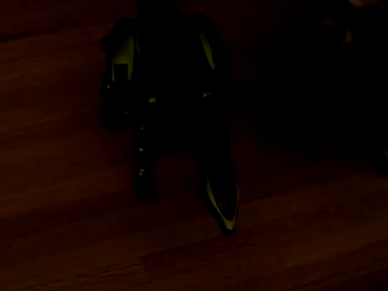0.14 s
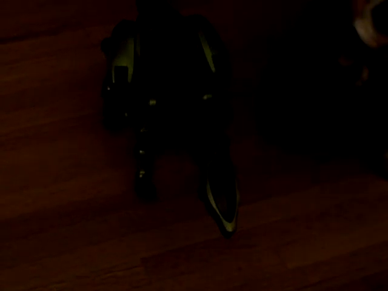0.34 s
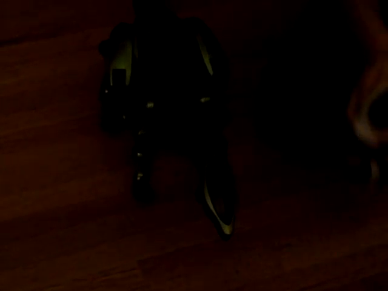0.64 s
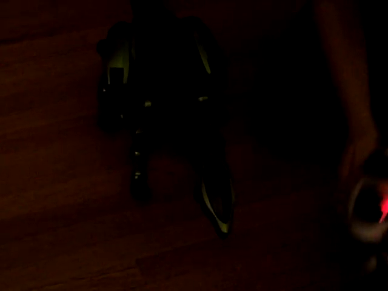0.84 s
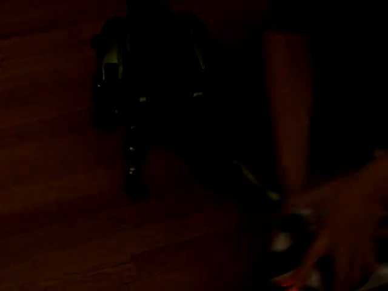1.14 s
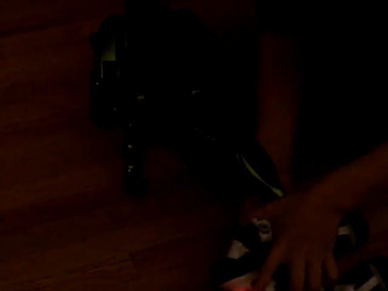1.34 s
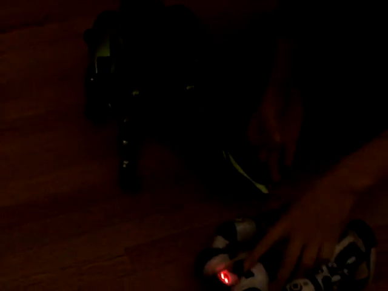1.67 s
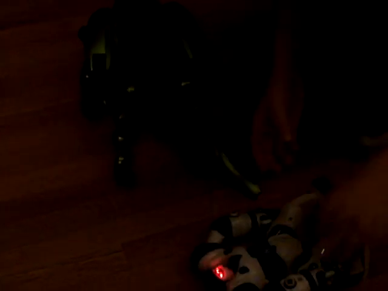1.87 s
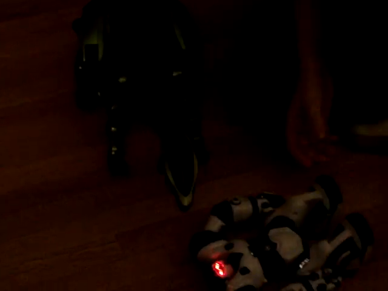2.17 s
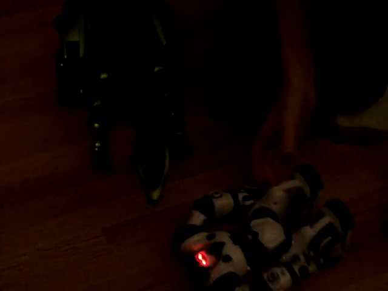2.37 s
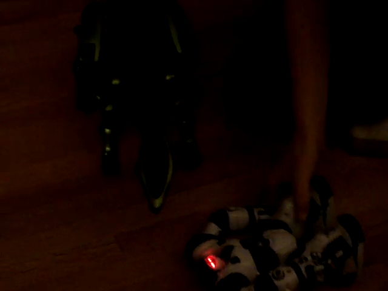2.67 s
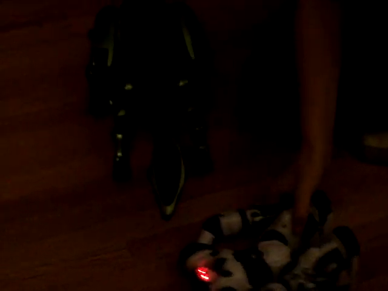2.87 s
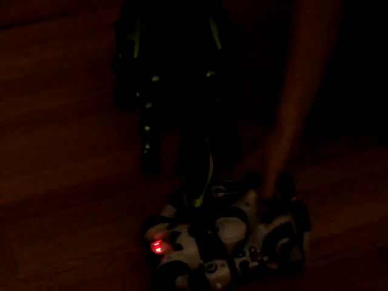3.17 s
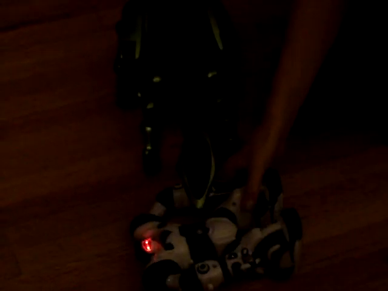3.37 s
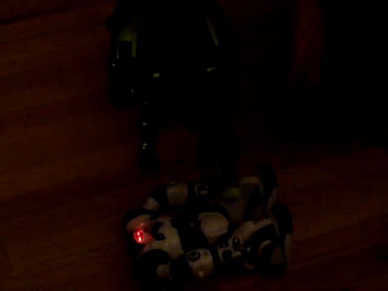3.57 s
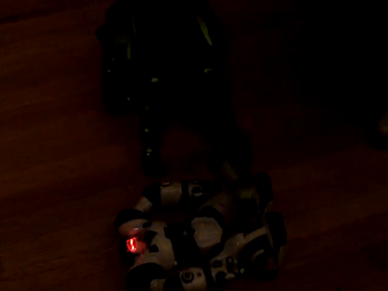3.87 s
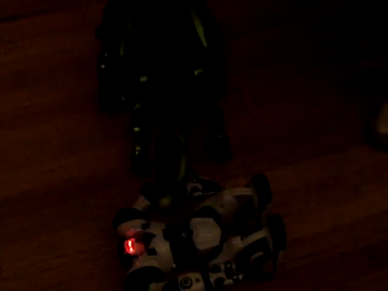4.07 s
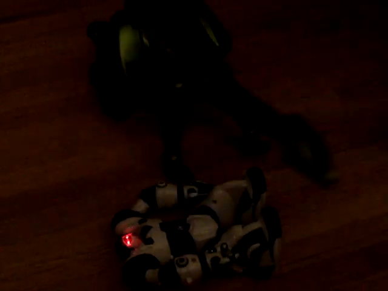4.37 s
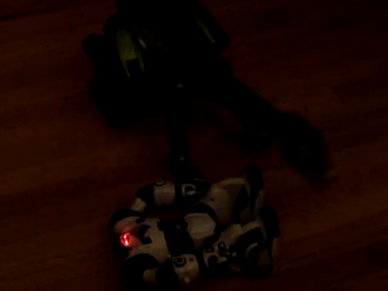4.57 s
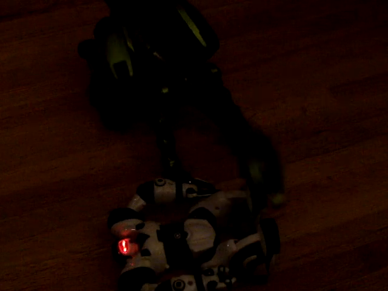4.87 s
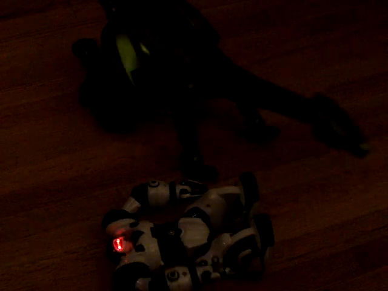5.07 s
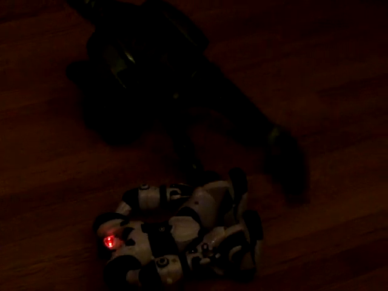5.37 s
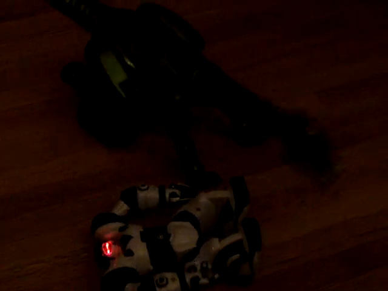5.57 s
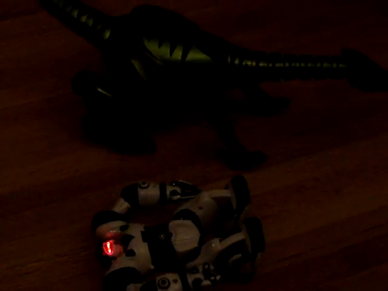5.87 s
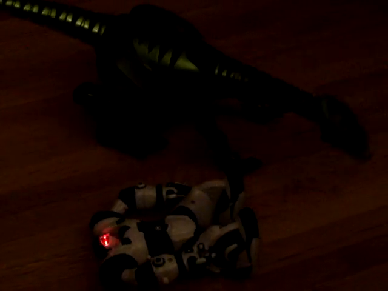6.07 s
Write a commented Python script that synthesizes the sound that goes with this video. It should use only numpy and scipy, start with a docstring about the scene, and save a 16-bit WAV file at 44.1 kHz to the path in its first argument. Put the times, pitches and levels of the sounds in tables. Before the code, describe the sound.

Whirring gears and irregular plastic clatter of a walking toy robot on floorboards indoors, with a brief hollow scrape of another toy.

```python
"""A small room with a wooden floor, where a plastic robot toy is walking.
Its gear teeth chatter into a whir and a hoarse whine; its feet drag, and feet and joints knock,
ringing the shell and the boards. A second toy is laid down and slid along: it sticks and slips,
so its hollow body scrapes. Underneath are mains hum, hiss and a few deep bumps
that reach the microphone through its holder."""
import sys
import numpy as np
from scipy import signal
from scipy.fft import rfft, irfft, next_fast_len
from scipy.io import wavfile

SR = 44100
rng = np.random.default_rng(int(sys.argv[2]) if len(sys.argv) > 2 else 0)


def waveform_to_disk(signal):
    """Save audio, clipped to [-1, 1], as 16-bit WAV at the path in sys.argv[1]."""
    frames = np.transpose(np.atleast_2d(signal))
    scaled = np.clip(frames, -1, 1) * 32767
    samples = np.round(scaled).astype(np.int16)
    wavfile.write(sys.argv[1], SR, samples)


N = 274253


def amp(db):
    """Turns decibels into a factor to multiply by."""
    return 10 ** (np.asarray(db) / 20)


def rms_one(x):
    """Scales a signal to an average strength (rms) of 1."""
    return x / np.sqrt(np.mean(x ** 2) + 1e-20)


def band(x, low_hz, high_hz):
    """Keeps what lies between two frequencies."""
    edges_hz = [low_hz, min(high_hz, .45 * SR)]
    return signal.sosfilt(signal.butter(2, edges_hz, "band", fs=SR, output="sos"), x)


def drift(rate_hz):
    """A smooth random wobble of about 1 either way; a higher rate wobbles faster."""
    r = np.exp(-80 * np.pi * rate_hz / SR)
    slow = signal.lfilter([1], [1, -2 * r, r * r], rng.standard_normal(N // 40 + 2002))[2000:]
    return np.interp(np.arange(N) / 40, np.arange(len(slow)), rms_one(slow))


def colour(x, spectrum):
    """Shapes bass and treble along a curve of (pitch_hz, level_db) points."""
    size = next_fast_len(N)
    hz, db = np.transpose(spectrum)
    gain = amp(np.interp(np.log(np.arange(size // 2 + 1) * SR / size + 1), np.log(hz), db))
    return rms_one(irfft(rfft(x, size) * gain, size)[:N])


def grains(per_s, spread_db):
    """Random clicks of uneven size."""
    sizes = amp(spread_db * np.minimum(rng.exponential(1, N), 5)) * rng.choice([-1, 1], N)
    return rms_one(sizes * (rng.random(N) < per_s / SR) + 1e-18)


def resonate(x, peaks):
    """Lets x ring at each (pitch_hz, width_hz, level_db) peak; adds them with alternating signs."""
    out = 0
    for k, (hz, width, db) in enumerate(peaks):
        r = np.exp(-np.pi * width / SR)
        ring = signal.lfilter([1, 0, -1], [1, -2 * r * np.cos(2 * np.pi * hz / SR), r * r], x)
        out = out + (-1) ** k * amp(db) * (1 - r * r) / 2 * ring
    return out


def stroke(start, stop, rise_s, sag_db, release_db_per_s):
    """Loudness of one movement: it rises, sags until the stop (swells if sag_db < 0), then dies."""
    t = np.arange(N) / SR
    progress = np.clip((t - start) / (stop - start), 0, 1)
    db = -sag_db * progress - release_db_per_s * np.maximum(t - stop, 0)
    return np.clip((t - start) / max(rise_s, .001), 0, 1) * amp(db)


# Tone of the hiss: pitch_hz, relative_db
HISS_SPECTRUM = [(15, -23.5), (30, -6), (70, -4.5), (120, 2), (290, -5), (450, -4), (1000, -4.5),
                 (3000, -14), (10300, -35)]

def background(hum_hz=121.7, hum_db=-58, hiss_db=-51.5):
    """Hiss of room and microphone, and a wavering hum at twice the mains frequency."""
    hum = amp(hum_db + 1.2 * drift(7.1)) * np.sqrt(2) * np.sin(2 * np.pi * hum_hz * np.arange(N) / SR)
    return hum + amp(hiss_db) * colour(rng.standard_normal(N), HISS_SPECTRUM)


# Jolts that reach the microphone through its holder: start_s, level_db
HOLDER_JOLTS = [(0.096, -59), (0.939, -56), (1.476, -56), (4.185, -24), (4.219, -48), (4.619, -34),
                (4.749, -49)]

def jolts(fade_s=0.63):
    """The holder swings lumpily in the deep bass after each jolt."""
    t, swing = np.arange(N) / SR, 0
    for start, db in HOLDER_JOLTS:
        swing = swing + (t > start) * amp(db - 60 * np.maximum(t - start, 0) / fade_s)
    deep_bass = [(10, -25), (25, 5.5), (50, -8), (110, 1.5), (170, 1.5), (300, -29)]
    return swing * colour(rng.standard_normal(N), deep_bass)


# The room's echo (fade_s is the time to fall by 60 dB): low_hz, high_hz, fade_s, relative_db
ECHO_BANDS = [(148, 700, 0.37, -2), (700, 1420, 0.62, -8), (2000, 2700, 0.41, -13),
              (5130, 8600, 0.067, -48)]

def room(x):
    """Many reflections blur into noise that dies away, fastest in the treble."""
    t = np.arange(SR // 2) / SR
    echo = sum(amp(db - 60 * t / fade_s) * band(rng.standard_normal(len(t)), low, high)
               for low, high, fade_s, db in ECHO_BANDS)
    onset = np.clip(t / 0.0037 - .5, 0, 1)
    return signal.fftconvolve(x, echo * onset / 30)[:N]


# The second toy's two slides, one list each: time_s, level_db, middle_boost_db, top_boost_db
SLIDE_CURVES = [
    [(0.96, -18, -18, -13), (0.988, -34.5, -1, -14), (1.004, -21.5, -4.5, -6), (1.06, -22, 5, 7.5),
     (1.115, -22, -4, 0.5), (1.16, -30, 8.5, 5), (1.266, -30, -4, -5.5), (1.33, -42.5, -3, 8)],
    [(1.47, -28, 4.5, 5), (1.55, -33.5, 3, 2), (1.596, -29, 4.5, 0), (1.74, -32, -0.5, 2),
     (1.76, -27.5, -2, 4), (1.92, -35.5, -3, 3), (1.97, -35, -7, 3)],
]
# How its hollow body rings, held a different way in each slide: pitch_hz, width_hz, relative_db
HOLLOW_BODY = [
    [(675, 140, 2), (1210, 230, -10.5), (1930, 250, -5), (2180, 117, 3), (2520, 510, -4), (3590, 190, -4),
     (4010, 510, -15)],
    [(624, 76, 6.5), (1215, 150, -5), (1670, 57, 0.5), (2270, 240, 5), (2936, 73, 2), (3650, 31, -0.5),
     (4440, 260, -30)],
]

def slides(top_from_hz=2800):
    """The second toy sticks and slips as it is pushed; the tiny jerks ring its hollow body."""
    out, t = np.zeros(N), np.arange(N) / SR
    slips = grains(2500, 2.6) * amp(1.5 * drift(30.0))
    for rows, body in zip(SLIDE_CURVES, HOLLOW_BODY):
        low = resonate(resonate(slips, body[:1]), [(604, 335, 0.018)])
        middle = resonate(slips, [peak for peak in body[1:] if peak[0] < top_from_hz])
        top = resonate(slips, [peak for peak in body[1:] if peak[0] >= top_from_hz])
        times, *curves = np.transpose(rows)
        level_db, middle_db, top_db = [np.interp(t, times, curve) for curve in curves]
        moving = np.clip((t - times[0]) / 0.0034, 0, 1) * np.clip((times[-1] - t) / 0.023, 0, 1)
        out += moving * amp(level_db) * (low + amp(middle_db) * middle + amp(top_db) * top) / np.std(low)
    return out


# The robot's feet and shell drag over the floor: start_s, stop_s, level_db, sag_db
FOOT_DRAGS = [(1.176, 1.46, -42, -2.5), (1.493, 1.676, -33.5, 8.5), (1.85, 2.3, -42.5, 6),
              (2.3, 2.55, -45, 1.5), (2.598, 2.7, -32.5, 9.5), (2.692, 2.957, -54, -11.5),
              (2.98, 3.28, -32, 6.5), (3.444, 3.6, -28.5, 11.5), (3.77, 4.055, -40, 5),
              (4.184, 4.454, -34, 9), (4.65, 4.86, -34, 9), (4.856, 4.97, -27, 16), (4.98, 5.253, -41.5, 0),
              (5.278, 5.45, -36, 10), (5.444, 5.546, -33, 9), (5.56, 5.833, -35.5, 11.5),
              (5.827, 5.984, -32, 8.5), (5.968, 6.12, -37.5, 6.5)]
# How the rubbed boards ring: pitch_hz, width_hz, relative_db
RUBBED_BOARDS = [(180, 40, -7), (270, 70, 0), (415, 55, -2), (505, 60, -10)]

def dragging_feet(grip_s=0.0097, release_db_per_s=116.5):
    """Dragging feet rub the boards and bring out their low notes."""
    power = sum((amp(db) * stroke(start, stop, grip_s, sag_db, release_db_per_s)) ** 2
                for start, stop, db, sag_db in FOOT_DRAGS)
    loudness = np.sqrt(power) * amp(2.3 * drift(24.0))
    boards = resonate(grains(900, 2.06), RUBBED_BOARDS)
    return loudness * rms_one(resonate(boards, [(275, 980, 0)]))


def cracks(at, level_db, pitch_hz, fade_s=0.0084, tone_db=-6):
    """Edge hits edge: a burst that dies in milliseconds, partly a tone, partly bright noise."""
    length = 400
    out, t = np.zeros(N + length), np.arange(length) / SR
    noise = band(rng.standard_normal((len(at), length)), 2800, 9800)
    tone = amp(tone_db) * np.sin(2 * np.pi * pitch_hz[:, None] * t)
    bursts = amp(level_db[:, None] - 60 * t / fade_s) * (tone + noise)
    np.add.at(out, at[:, None] + np.arange(length), bursts)
    return out[:N]


def strike(at, level_db, notes, spread_db):
    """Each contact rings each note with a random strength and sign; level_db is contacts x notes."""
    out, chance = np.zeros(N), rng.standard_normal((len(at), 2, len(notes)))
    for k, (hz, note_db, fade_s) in enumerate(notes):
        strength = amp(level_db[:, k] + note_db + spread_db * chance[:, 0, k])
        clicks = np.full(N, 1e-18)
        np.add.at(clicks, at, strength * np.sign(chance[:, 1, k]))
        r, w = amp(-60 / (fade_s * SR)), 2 * np.pi * hz / SR
        out += signal.lfilter([0, np.sin(w)], [1, -2 * r * np.cos(w), r * r], clicks)
    return out


# Notes of the struck plastic shell: pitch_hz, relative_db, fade_s
SHELL_NOTES = [(587, 11.5, 0.0091), (663, 9.5, 0.014), (784, -7.5, 0.05), (923, -2.5, 0.023),
               (1130, -1, 0.023), (1232, -2, 0.046), (1364, 1.5, 0.031), (1510, 0.5, 0.034),
               (1758, -10.5, 0.045), (1840, -3, 0.028), (2320, -12, 0.0073), (2500, -7, 0.01),
               (2780, 5.5, 0.029), (3060, -4, 0.052), (3640, -30, 0.017), (3710, -1.5, 0.12),
               (4290, 5, 0.039), (4805, 4.5, 0.046)]
# Notes of the struck floor boards: pitch_hz, relative_db, fade_s
BOARD_NOTES = [(130, -13, .08), (180, -7, .1), (235, -4, .1), (264, 0, .16), (296, -1, .13), (405, -3, .14),
               (432, -4, .11), (505, -10, .07)]
# Knocks, with relative levels: start_s, shell_db, part_pitch_hz, thud_db, crack_db, rattle_db
KNOCKS = [(0.098, -20.5, 1410, -52, 4, -16), (0.392, -30, 3010, -59, -16, -12),
          (0.572, -36, 3200, -60, -17, 0.5), (0.716, -32, 2970, -51, -23, -9),
          (0.9412, 1.5, 1330, -23, 8, -5.5), (0.959, -35, 710, -28, -8, -3),
          (1.0105, -22, 2210, -27, -23, -5), (1.4669, -12, 2180, -25, -29, 0),
          (1.477, -2, 1240, -14.5, 2, -11.5), (1.5, -3, 1230, -29, 6, -7), (1.5129, -13, 1290, -28, 3, 2.5),
          (1.5392, -7.5, 2260, -15, -28, -1.5), (1.618, -21, 1680, -34, -15, 2),
          (1.6607, -18, 2250, -46, -21, -5), (1.7017, -17, 2270, -39, -28, 0),
          (1.929, -19, 2900, -38, -16, -20), (1.963, -10.5, 1960, -25, -23, -11),
          (2.156, -40, 2630, -49, -15, 0), (2.302, -9.5, 1410, -23.5, -17, -8),
          (2.3161, -11.5, 1160, -28, -1.5, -3), (2.6034, -4.5, 2630, -24, 0.5, -7),
          (2.623, -12.5, 2860, -34, -8, -3.5), (2.8741, -24, 2780, -35.5, -14, 0),
          (2.9679, -17.5, 2900, -27.5, -38, -7), (3.2275, -17.5, 2800, -27.5, -21, 0),
          (3.4068, -36, 1180, -46, -14, -7), (3.419, -4, 1320, -11.5, -5, -18),
          (3.4368, -10.5, 1310, -15.5, -15.5, -2.5), (3.536, -16, 1330, -19.5, -9, -1.5),
          (3.7622, -21.5, 1280, -22, -22, 0), (3.814, -25, 3130, -25, -23, -14),
          (3.889, -37, 710, -23.5, -20.5, 0), (4.012, -16, 1520, -34, -8, -4.5),
          (4.1785, -9, 1250, -14, -2.5, -2), (4.214, -18, 710, -18.5, -26, -21),
          (4.604, -23, 2140, -39, -16, 0), (4.6457, -14, 2350, -10.5, -7, -14),
          (4.668, -13, 2700, -29, -7.5, 0), (4.7095, -3.5, 1530, -27, 4.5, -6),
          (4.8655, -9, 1070, -23, 1, -18), (5.0392, -13, 1260, -26, -27, -14),
          (5.276, -18.5, 720, -16.5, -13, -14), (5.4522, -15, 2900, -24, -11, 0),
          (5.482, -16.5, 3000, -46, -11, -1), (5.558, -28, 2960, -20, -17, -7),
          (5.812, -16.5, 2150, -30, -31, -25), (5.8415, -7, 1460, -20, -6, -3.5),
          (5.857, -13, 1420, -37, -2, -13), (5.9859, -13.5, 2860, -16.5, -24, -1.5),
          (6.046, -16, 2120, -38, -6, -13), (6.181, -23, 3170, -42, -24, -12)]

def knocks(bounces=5, rattle_s=.032, lowest_crack_hz=2950, crack_octaves=0.862):
    """One hit, then weaker bounces of loose parts; each cracks and rings the shell and the boards."""
    start, shell_db, part_hz, thud_db, crack_db, rattle_db = np.array(KNOCKS).T[:, :, None]
    chance = rng.random((len(KNOCKS), 3, bounces + 1))
    lateness, weakness = chance[:, 0, 1:], chance[:, 1, 1:]
    first_hit = np.zeros_like(start)   # no delay and no loss
    delay_s = np.hstack([first_hit, lateness * rattle_s])
    loss_db = np.hstack([first_hit, np.minimum(rattle_db, 0) - 5.0 * lateness - 6.0 * weakness])
    at = np.minimum(((start + delay_s) * SR).astype(int).ravel(), N - 1)
    octaves_off = np.abs(np.log2(np.array(SHELL_NOTES)[:, 0] / np.repeat(part_hz, bounces + 1)[:, None]))
    near_db = -11.0 * np.minimum(octaves_off, 1.5)   # notes near the struck part's pitch ring most
    shell = strike(at, (shell_db + loss_db).reshape(-1, 1) - 11.5 + near_db, SHELL_NOTES, spread_db=3.0)
    boards_db = np.repeat((thud_db + loss_db).reshape(-1, 1) - 11.0, len(BOARD_NOTES), axis=1)
    thud = strike(at, boards_db, BOARD_NOTES, spread_db=2.5)
    crack_hz = lowest_crack_hz * 2 ** (crack_octaves * chance[:, 2])
    return shell + thud + cracks(at, (crack_db + loss_db).ravel() - 6.0, crack_hz.ravel())


# Gears sing hoarsely under load: start_s, stop_s, pitch_hz, level_db
GEAR_WHINES = [(0.19, .52, 3530, -41.5), (0.575, .92, 3190, -39.5), (0.715, 0.903, 2770, -40.5),
               (.98, 1.265, 3560, -33), (2.007, 2.286, 3680, -40), (2.3, 2.478, 3850, -36.5),
               (2.84, 3.294, 2740, -39.5), (2.851, 3.047, 3480, -44), (4.24, 4.4, 2200, -40),
               (5.612, 5.74, 2000, -35), (5.92, 5.993, 3340, -35), (5.902, 6.132, 1910, -36)]

def whines(width_share=0.17, overtone_ratio=1.906, overtone_db=-4):
    """Chattering teeth ring at one pitch and its overtone, swelling and fading with the load."""
    out, teeth = np.zeros(N), grains(2500, 2.8) * amp(2.5 * drift(35.0))
    for start, stop, hz, db in GEAR_WHINES:
        span = slice(round(start * SR), round(stop * SR))
        for pitch_hz, level_db in (hz, db), (overtone_ratio * hz, db + overtone_db):
            ring = resonate(teeth[span], [(pitch_hz, width_share * hz, 0)])
            whine = resonate(ring, [(pitch_hz, .3 * hz, 0)])
            out[span] += amp(level_db) * rms_one(whine) * signal.windows.tukey(len(whine), .4)
    return out


# Motor runs: start_s, stop_s, spin_up_s, whir_db, sag_db, clatter_db, treble_boost_db, body_boost_db
MOTOR_RUNS = [(.099, .11, .004, -40, 2, 6, 0, -12), (.13, .56, .16, -41, 5, 0, -5, -2),
              (.6, .71, .05, -38, 0, 0, -6, -1), (.716, .92, .004, -36, 3, 3, -6, -2),
              (.94, 1.24, .004, -30, 8, 4, -8, 10), (1.26, 1.46, .03, -39, -7, 0, -6, 2),
              (1.475, 1.95, .004, -33, 5, 8, -7, -2), (1.96, 2.295, .05, -39, 1, 0, -2, 2),
              (2.305, 2.6, .004, -37, 0, 2, -4, 4), (2.607, 2.8, .004, -37, 9, 11, -6, 1),
              (2.8, 3.27, .1, -36.5, 2, 0, -2.5, 2), (3.422, 3.74, .004, -30, 8, 8, -5.5, 1),
              (3.77, 3.93, .02, -38, -1, 0, -7, 5), (3.94, 4.1, .08, -32, 4, 0, -4, 0),
              (4.182, 4.64, .004, -34, 1, 4, -4.5, 3), (4.65, 4.7, .004, -27, 4, 0, -9, 0),
              (4.712, 4.85, .004, -30, 7, 3, -5, -5), (4.867, 5.04, .004, -35, 3, 9, -6, 4),
              (5.08, 5.27, .05, -36, -2, 0, -2, 3), (5.278, 5.44, .004, -30, 8, 1, -6, -1),
              (5.455, 5.56, .004, -36, 0, 2, -4, 8), (5.58, 5.81, .05, -33, 6, 0, -4, 2),
              (5.845, 6.21, .004, -33.5, 4, 3, -2.5, 2)]

def motor(clatter_s=0.037, coast_db_per_s=118, idle_db=-65.5):
    """The motor spins up, often clattering, and coasts down: gives level, treble and body curves."""
    t = np.arange(N) / SR
    power, treble, body = amp(2 * idle_db), 0, 0
    for start, stop, spin_up_s, whir_db, sag_db, clatter_db, treble_db, body_db in MOTOR_RUNS:
        dying = (t > start) * np.exp(-np.maximum(t - start, 0) / clatter_s)
        clatter = dying * (amp(max(clatter_db, 0)) - 1)
        run = (amp(whir_db) * (stroke(start, stop, spin_up_s, sag_db, coast_db_per_s) + clatter)) ** 2
        power += run
        treble += run * treble_db   # the loudest run shapes the tone most
        body += run * body_db
    return 10 * np.log10(power), treble / power, body / power


# Tone of the whir: pitch_hz, relative_db
WHIR_SPECTRUM = [(290, -49), (500, -22.5), (619, -9.5), (1050, -12), (1510, -9), (1620, -7), (1840, -3.5),
                 (2010, -3), (3400, -2), (5270, -4.5), (7580, 6), (8480, -2.5), (9980, -17), (13000, -59),
                 (22000, -120)]
# How the gearbox rings: pitch_hz, width_hz, relative_db
GEARBOX_PEAKS = [(1460, 285, 1.5), (2600, 100, -28), (3330, 82, -12.5), (7500, 460, 2.5)]

def gears(whir_db, treble_db, body_db, swell_db=2.0, flicker_db=4.5):
    """Teeth chatter in the shell; as limbs move, each band swells on its own and the treble flickers."""
    teeth = grains(per_s=6000, spread_db=2.0)
    whir = colour(teeth + 0.5 * resonate(teeth, GEARBOX_PEAKS), WHIR_SPECTRUM)
    edges_hz = 350 * 2 ** np.arange(0, 5.1, 1 / 3)
    out = 0
    for k, (low, high) in enumerate(zip(edges_hz, edges_hz[1:])):
        boost_db = treble_db * (low > 4900) + body_db * (low < 1300)
        wobble_db = swell_db * drift(9.6) + flicker_db * low / 8000 * drift(65.0)
        sign = (-1) ** k   # keeps neighbouring bands from cancelling
        out = out + sign * amp(boost_db + wobble_db) * band(whir, low, high)
    return amp(whir_db + 3.5 + 1.08 * drift(32.0)) * out


def scene():
    """Adds both toys, the echo of the knocks and the background into one channel."""
    hits = knocks()
    toys = hits + room(hits) + slides() + gears(*motor()) + whines() + dragging_feet()
    # small bodies give off no deep bass
    airborne = signal.sosfilt(signal.butter(2, 130, "high", fs=SR, output="sos"), toys)
    return (airborne + jolts() + background())[None]


def record(dry):
    """Rounds off the loudest peaks and cuts the highest treble."""
    cutoff_hz = 10120
    rounded = .75 * np.tanh(dry / .75)
    return signal.sosfilt(signal.ellip(12, .5, 60, cutoff_hz, fs=SR, output="sos"), rounded)


dry = scene()
out = record(dry)
waveform_to_disk(out)
```